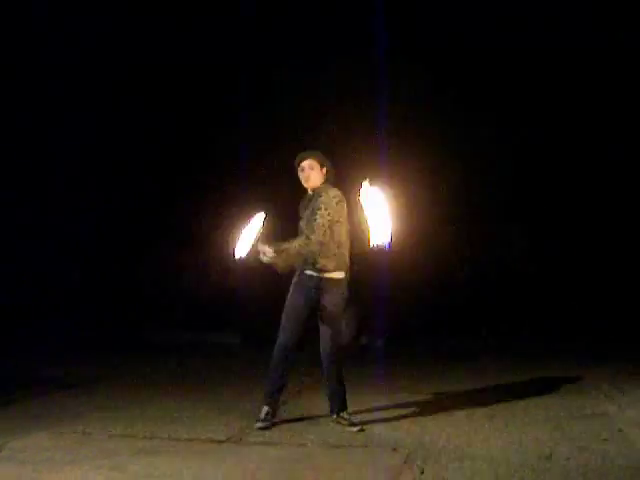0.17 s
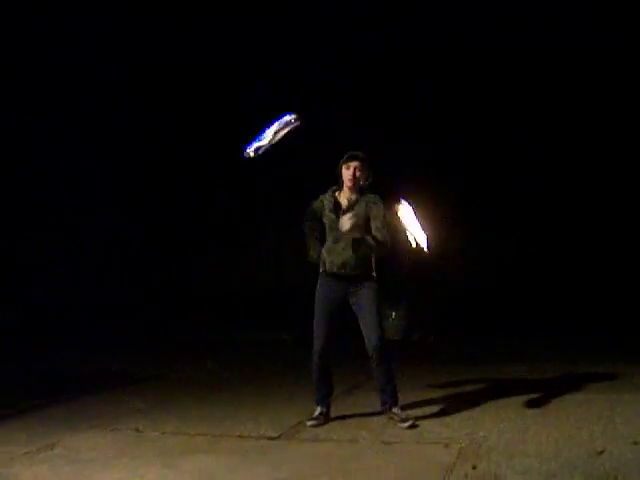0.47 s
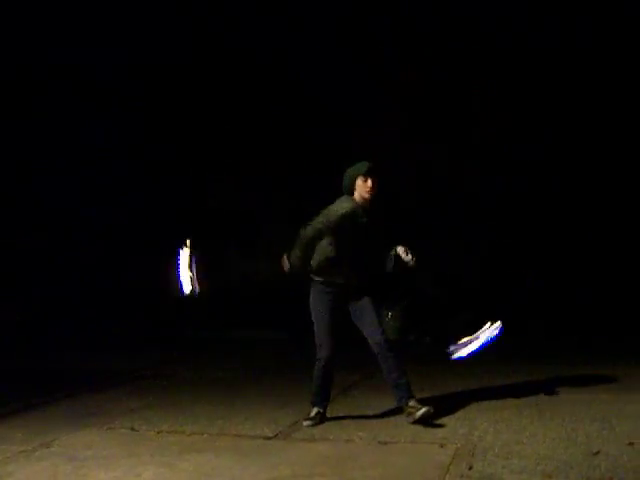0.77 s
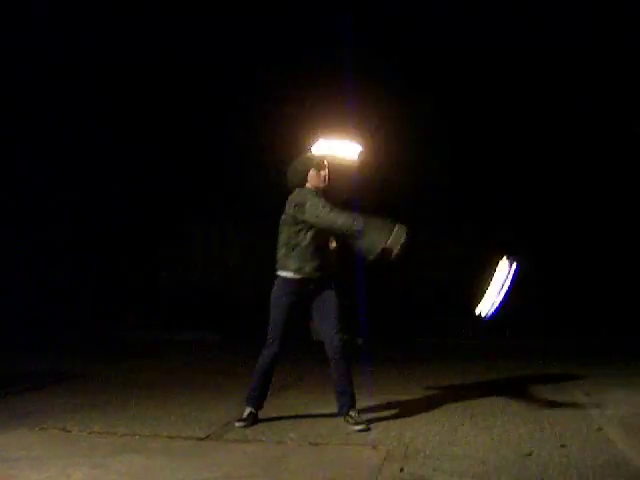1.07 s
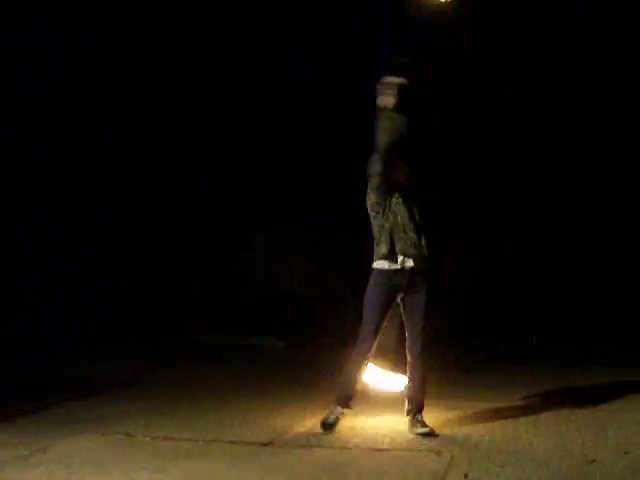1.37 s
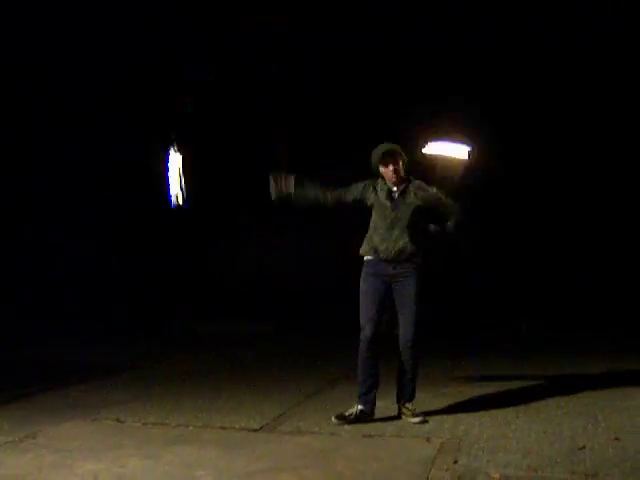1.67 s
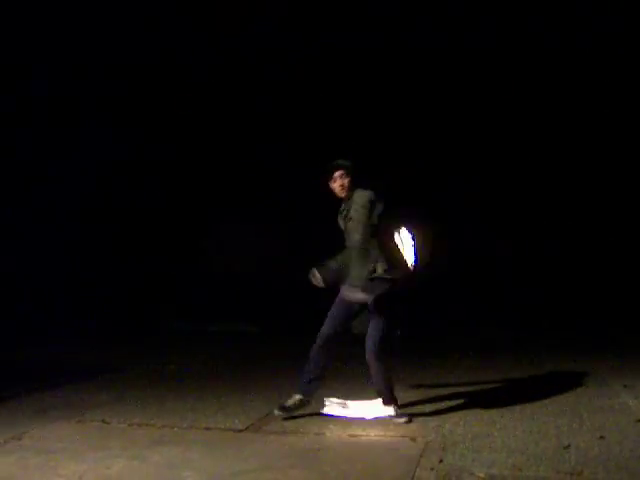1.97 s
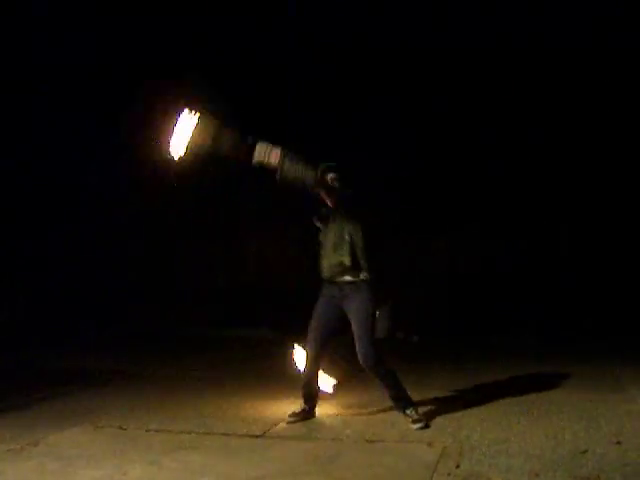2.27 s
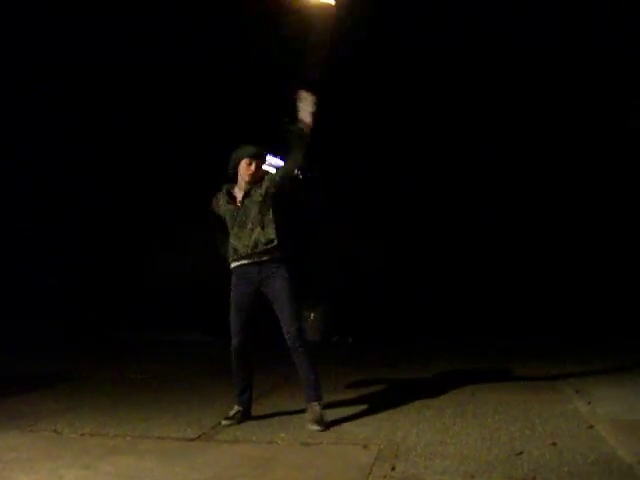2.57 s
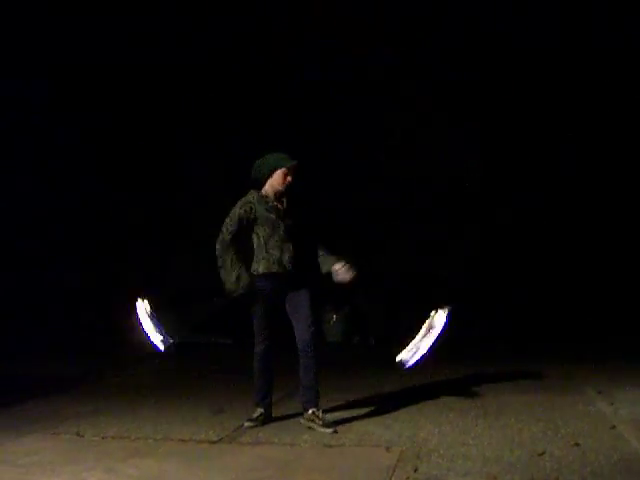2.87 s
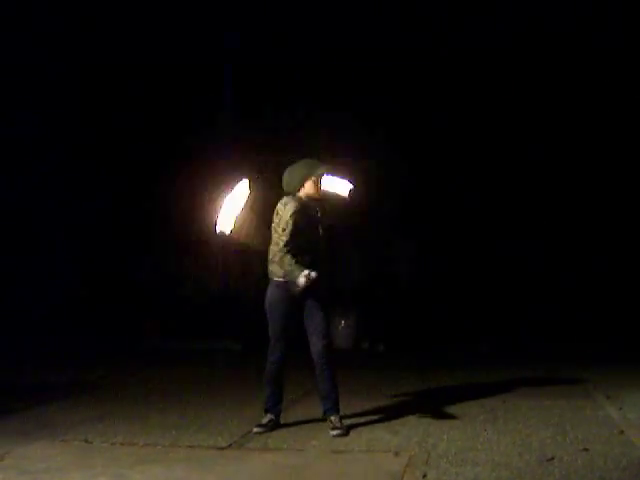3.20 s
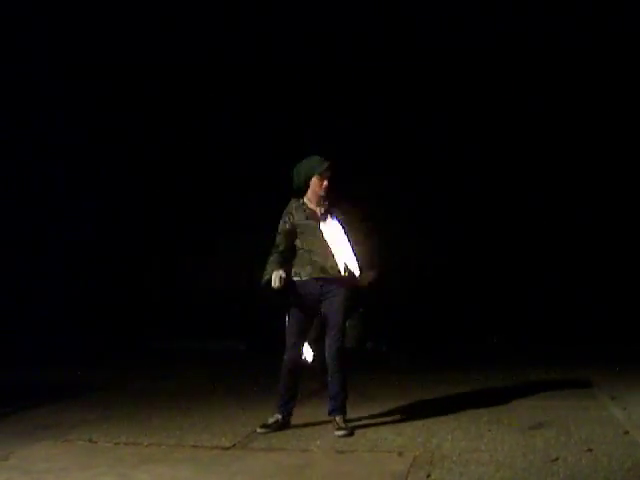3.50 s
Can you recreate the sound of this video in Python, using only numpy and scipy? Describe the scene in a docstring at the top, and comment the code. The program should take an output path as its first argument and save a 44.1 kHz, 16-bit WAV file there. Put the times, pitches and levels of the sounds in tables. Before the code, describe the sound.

Fire poi rush round in uneven, low fluttering whooshes with a light hiss in a paved yard at night. A tiny gritty scrape and tick come after two seconds; a faint cricket, wind and far traffic lie behind.

```python
"""A paved yard at night: two burning poi swing in circles some metres from a camera. Each flame is noise that
rushes, hisses and flutters; its echo off the paving sweeps a comb up and down as it rises and falls.
One wick scrapes the ground, as dense random grit and then a single tick. A cricket, a pulsed tone, chirps
far off over wind and distant traffic, both of them drifting noise."""
import sys
import numpy as np
from scipy import signal
from scipy.fft import rfft, irfft, next_fast_len
from scipy.io import wavfile
from scipy.ndimage import uniform_filter1d, map_coordinates

SR = 44100
rng = np.random.default_rng(int(sys.argv[2]) if len(sys.argv) > 2 else 0)


def elevation(decibels):
    """Turn decibel levels (scalar or array-like) into linear amplitude ratios."""
    levels = np.asarray(decibels, float)
    return 10 ** (levels / 20)


def wrap_up_sound(samples):
    """Save the sound to the file named by the first command line argument, as 16-bit audio."""
    columns = np.atleast_2d(samples).T
    # keep every value between -1 and 1, then stretch to whole-number steps
    tamed = np.clip(columns, -1, 1)
    steps = np.round(tamed * 32767).astype(np.int16)
    wavfile.write(sys.argv[1], SR, steps)


N = 160524
TIME = np.arange(N) / SR  # seconds


def unit(x):
    """Scales a signal to rms 1."""
    return x / np.sqrt(np.mean(x ** 2) + 1e-20)


def coloured(x, points):
    """Equalises x through (Hz, dB) points, joined on a log frequency axis."""
    size = next_fast_len(N + 8192)
    hz, db = np.transpose(points)
    bins_hz = np.fft.rfftfreq(size, 1 / SR)
    gain = elevation(np.interp(np.log(bins_hz + 1), np.log(hz + 1), db))
    return irfft(rfft(x, size) * gain, size)[:N]


def wobble(rate):
    """A smooth random curve through rate knots a second, 199 at most."""
    knots = rng.standard_normal(int(N / SR * 200) + 4)
    return map_coordinates(knots, [TIME * min(rate, 199)])


def drift(spectrum, level):
    """Coloured noise on a slow level curve, with gusts and patches of random gain in time and pitch."""
    gust_db, patchy_db = .4, 1.2
    cells = signal.stft(rng.standard_normal(N + 512), nperseg=512)[2]
    patches = uniform_filter1d(rng.standard_normal(cells.shape), size=5, axis=0)
    patches = uniform_filter1d(patches, size=12, axis=1)
    air = signal.istft(cells * elevation(patchy_db * unit(patches)), nperseg=512)[1][:N]
    level_db = np.interp(TIME, *np.transpose(level)) + gust_db * wobble(4.4)
    return elevation(level_db) * unit(coloured(air, spectrum))


# Tone of the low wind. Each row: frequency in Hz, relative density in dB per Hz.
WIND_TONE = [(15, -17.5), (25, -2), (45, 1.5), (75, 0.5), (100, -3), (140, -2.5), (245, -12), (450, -19.5),
             (1500, -30), (5000, -40.5), (9000, -48)]
# Wind strength. Each row: time in seconds, level in dB before gusts.
WIND_LEVEL = [(0, -25), (.6, -24.5), (1.2, -24), (1.6, -23.5), (2.05, -21.5), (2.25, -26.5), (2.6, -25.5),
              (3.1, -25), (3.64, -23)]
# Tone of the far traffic. Each row: frequency in Hz, relative density in dB per Hz.
TRAFFIC_TONE = [(250, -34), (420, -3), (560, 0), (760, 0.5), (1050, -9), (1350, -9), (1800, -23),
                (3000, -34.5)]
# Traffic strength. Each row: time in seconds, level in dB before gusts.
TRAFFIC_LEVEL = [(0, -31.5), (.25, -32.5), (.5, -32), (1.001, -31.5), (1.5, -31.5), (1.949, -33),
                 (2.15, -40.5), (2.5, -31.5), (2.8, -32), (3.1, -35.5), (3.3, -33), (3.64, -33.5)]


def night():
    """Low wind and the roar of far traffic, two beds of drifting noise."""
    return drift(WIND_TONE, WIND_LEVEL) + drift(TRAFFIC_TONE, TRAFFIC_LEVEL)


# The cricket's chirps. Each row: start in seconds, level in dB before the wing pulses.
CRICKET_CHIRPS = [(0, -56), (.38, -55), (.77, -56), (1.22, -54), (1.66, -56), (2.39, -54), (2.77, -55.5),
                  (3.11, -54), (3.5, -54.5)]


def cricket():
    """Short trains of wing pulses on one wavering tone."""
    tone_hz, waver_hz = 5050, 22
    length_s, pulses_per_s = .21, 56
    tone = np.sin(2 * np.pi * np.cumsum(tone_hz + waver_hz * wobble(60)) / SR)
    chirps = np.zeros(N)
    for start_s, db in CRICKET_CHIRPS:
        since = TIME - start_s
        swell = np.sqrt(np.sin(np.pi * np.clip(since / length_s, 0, 1)).clip(0))
        pulses = 1.2 - .8 * np.cos(2 * np.pi * pulses_per_s * since)
        chirps += elevation(db) * swell * pulses
    return tone * chirps


# Tone of the wick dragging on paving. Each row: frequency in Hz, relative density in dB per Hz.
GRIT_TONE = [(500, -35), (1300, -9), (2800, -12), (3800, -6), (5000, -12), (7400, -13), (9000, -11)]


def scrape():
    """Dense grit under the wick while it drags: random clicks of either sign and uneven strength."""
    start_s, length_s, edge_s, level_db = 2.0235, .03, .001, -27
    grains_per_s, spread_db = 4500, 4.5
    struck = rng.random(N) < grains_per_s / SR
    sign = np.sign(rng.random(N) - .5)
    strength = elevation(spread_db * rng.standard_normal(N))
    grit = unit(coloured(struck * sign * strength, GRIT_TONE))
    drag = np.clip(np.minimum(TIME - start_s, start_s + length_s - TIME) / edge_s, 0, 1)
    return elevation(level_db) * drag * grit


# The short tick after the scrape. Each row: start in seconds, level in dB at its onset.
WICK_TICKS = [(2.1266, -29)]
# Tone of the tick. Each row: frequency in Hz, relative density in dB per Hz.
TICK_TONE = [(800, -45), (2000, -14), (3600, 4.5), (4800, -22), (9000, -28)]


def tick():
    """A burst of coloured noise that starts at once and dies away exponentially."""
    t60_s = .012  # time to fall by 60 dB
    decay = sum(elevation(db - 60 * np.abs(TIME - s) / t60_s) * (TIME > s) for s, db in WICK_TICKS)
    return decay * unit(coloured(rng.standard_normal(N), TICK_TONE))


def height(path):
    """Flame height in metres: a smooth curve through the points, level at each top and bottom."""
    s, metres = np.transpose(path)
    rise = np.diff(metres)
    same_way = rise[1:] * rise[:-1] > 0
    speed = np.gradient(metres, s) * np.r_[1, same_way, 1]
    place = np.interp(TIME, s, np.arange(len(s)))
    k = np.minimum(place.astype(int), len(s) - 2)
    u, span = place - k, np.diff(s)[k]  # progress through the segment (0 to 1), its length in seconds
    leaving = (1 - u) * (speed[k] * span - rise[k])
    arriving = u * (rise[k] - speed[k + 1] * span)
    return metres[k] + u * rise[k] + u * (1 - u) * (leaving + arriving)


# Echo off the paving. Each row: frequency in Hz, gain in dB.
PAVING_ECHO = [(200, -1.5), (2000, -3), (8000, -5.5)]


def over_paving(x, path):
    """x plus its echo off the ground, later the higher the source swings, which sweeps a comb."""
    distance_m, mic_height_m, sound_m_per_s = 7, 1.5, 343
    flame_m = height(path)
    direct_m = np.hypot(distance_m, flame_m - mic_height_m)
    bounced_m = np.hypot(distance_m, flame_m + mic_height_m)
    lag_s = (bounced_m - direct_m) / sound_m_per_s
    return x + map_coordinates(coloured(x, PAVING_ECHO), [(TIME - lag_s) * SR])


def turbulence(spectrum, speeds):
    """Coloured noise of rms 1 whose level moves at several speeds."""
    noise = rng.standard_normal(N)
    level_db = sum(depth_db * wobble(rate) for rate, depth_db in speeds)
    return unit(coloured(noise * elevation(level_db), spectrum))


# Tone of the air rush. Each row: frequency in Hz, relative density in dB per Hz.
RUSH_TONE = [(250, -34.5), (500, -14.5), (900, -5.5), (1400, -13.5), (2000, -13.5), (4100, -22.5),
             (6000, -33), (9000, -43)]
# Tone of the flame hiss. Each row: frequency in Hz, relative density in dB per Hz.
HISS_TONE = [(2000, -27), (4000, -0.5), (5500, -7.5), (7000, -3.5), (9000, -7)]
# Tone of the flame flutter. Each row: frequency in Hz, relative density in dB per Hz.
FLUTTER_TONE = [(53, -31), (90, -2), (160, -2.5), (230, 2), (350, -0.5), (480, -10), (700, -60),
                (1200, -120)]
# Turbulence in the rush and hiss. Each row: speed in knots per second, depth in dB.
RUSH_FLICKER = [(20, .5), (45, .9), (90, 1.3)]
# Turbulence in the flutter. Each row: speed in knots per second, depth in dB.
FLUTTER_LUMPS = [(25, 1), (60, 1.3)]


def flame(rush_db, hiss_db, flutter_db):
    """One burning wick: air rushing past, a hiss set relative to that rush, and a low flutter."""
    rush = elevation(rush_db) * turbulence(RUSH_TONE, RUSH_FLICKER)
    hiss = elevation(rush_db + hiss_db) * turbulence(HISS_TONE, RUSH_FLICKER)
    flutter = elevation(flutter_db) * turbulence(FLUTTER_TONE, FLUTTER_LUMPS)
    return rush + hiss + flutter


# Path of the flame on the wide circle. Each row: time in seconds, height in metres.
WIDE_PATH = [(-.06, .9), (.06, 1.46), (.15, 1.12), (.22, .7), (.29, .54), (.37, .8), (.45, 1.65),
             (.54, 2.04), (.63, 1.68), (.7, 1.03), (.8, .53), (.87, .26), (.94, .15), (1, .37), (1.07, .87),
             (1.14, 1.42), (1.22, 1.95), (1.3, 2.4), (1.42, 2.68), (1.54, 2.4), (1.63, 1.77), (1.71, 1.12),
             (1.8, .7), (1.9, .27), (1.97, .14), (2.03, .26), (2.12, .74), (2.22, 1.42), (2.3, 1.9),
             (2.4, 2.32), (2.53, 2.6), (2.65, 2.4), (2.73, 1.86), (2.8, 1.25), (2.87, .57), (2.94, .25),
             (3, .5), (3.08, 1.35), (3.14, 1.68), (3.22, 1.3), (3.32, .85), (3.39, .45), (3.46, .87),
             (3.52, 1.33), (3.62, 1.66), (3.7, 1.5)]
# Path of the flame on the tight circle. Each row: time in seconds, height in metres.
TIGHT_PATH = [(-.12, .8), (.08, 1.8), (.3, .45), (.56, 1.58), (.76, .8), (.98, 1.85), (1.13, .85),
              (1.35, .22), (1.42, .45), (1.52, .95), (1.66, 1.5), (1.84, 1.1), (2.02, 1.5), (2.15, 1),
              (2.22, .54), (2.33, .12), (2.45, .82), (2.55, 1.38), (2.64, 1.55), (2.72, 1.33), (2.8, .87),
              (2.95, .4), (3.17, 1.3), (3.42, .45), (3.66, 1.3)]
# The swings, shared between both flames before the echo. Each row: time in seconds, air rush in dB,
# flutter in dB, hiss over rush in dB, tight poi over wide poi in dB.
SWINGS = [(0.0, -38, -22, -26.5, -12), (0.11, -37.5, -37, -16, -6), (0.25, -31.5, -24, -13, 3.5),
          (0.34, -33, -23.5, -21, -9.5), (0.39, -37, -27, -7.5, 6), (0.61, -32, -28.5, -27, -17.5),
          (0.64, -34.5, -26.5, -16.5, -4), (0.83, -31.5, -21, -11.5, -10.5), (0.95, -35.5, -24, -8, 2.5),
          (1.01, -34.5, -30, -18.5, -11), (1.06, -30, -23, -8.5, -11.5), (1.11, -33, -32.5, -26.5, -20),
          (1.26, -36.5, -28.5, -23, 4), (1.63, -37, -29.5, -12, -13), (1.72, -33.5, -27.5, -12.5, -6),
          (1.76, -33, -19, -14, 0.5), (2.01, -33.5, -26, -16.5, -8), (2.04, -32, -27, -6, -4.5),
          (2.08, -48.5, -37.5, -7.5, -17), (2.12, -38, -28, -22, -8), (2.18, -40, -31.5, -15, -9),
          (2.31, -39.5, -27, -16, 5.5), (2.41, -43, -32.5, -22, -1), (2.72, -36.5, -31.5, -10.5, -8),
          (2.78, -35, -30.5, -11.5, 3), (2.89, -30.5, -26, -13.5, -9), (2.95, -32.5, -31.5, -9.5, -18),
          (2.96, -33, -22.5, -11, -5), (3.18, -39.5, -33, -22.5, -4.5), (3.26, -35, -21, -12, -8),
          (3.45, -36, -27, -15, 4), (3.49, -34, -24, -14, 1), (3.63, -44, -27.5, -32, -9),
          (3.64, -45.5, -39, -12, 1)]


def poi():
    """Two flames share the power of each swing; each has its own noise and path over the ground."""
    s, *columns = np.transpose(SWINGS)
    rush_db, flutter_db, hiss_db, tight_db = [np.interp(TIME, s, c) for c in columns]
    tight_share = 1 / (1 + elevation(-2 * tight_db))  # of the power
    wide = np.sqrt(1 - tight_share) * flame(rush_db, hiss_db, flutter_db)
    tight = np.sqrt(tight_share) * flame(rush_db, hiss_db, flutter_db)
    return over_paving(wide, WIDE_PATH) + over_paving(tight, TIGHT_PATH)


def scene():
    """All sources at one microphone."""
    return (poi() + scrape() + tick() + cricket() + night())[None]


# Treble roll-off of the camera. Each row: frequency in Hz, gain in dB.
CAMERA_TREBLE = [(6500, -0.5), (7400, -4), (8000, -10.5), (8500, -19), (8900, -31), (9300, -56.5)]


def camera_input(x):
    """Soft overload rounds off loud peaks, then the treble rolls off."""
    ceiling, knee = .5, 3  # ceiling in full scales; a higher knee bends later and harder
    soft = x / (1 + np.abs(x / ceiling) ** knee) ** (1 / knee)
    return coloured(soft, CAMERA_TREBLE)


def band_limit(x):
    """A steep low-pass at the top of the band."""
    return signal.sosfilt(signal.butter(12, 8980, fs=SR, output="sos"), x)


def record(dry):
    """The finished mix as it comes out of the camera."""
    mix = camera_input(dry[0])[None]
    return band_limit(mix)


dry = scene()
out = record(dry)
wrap_up_sound(out)
```